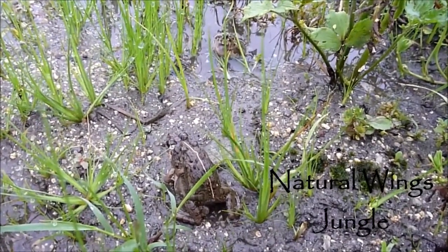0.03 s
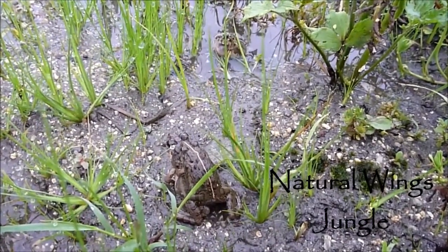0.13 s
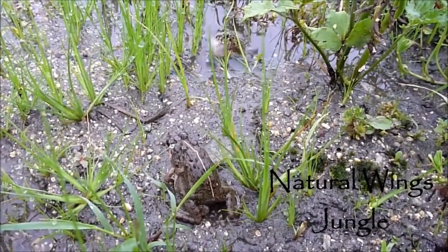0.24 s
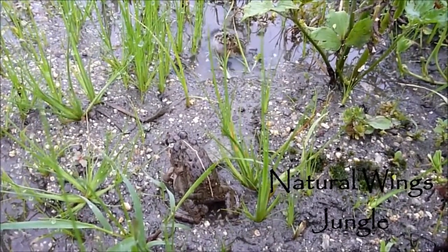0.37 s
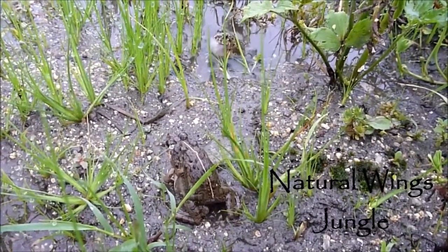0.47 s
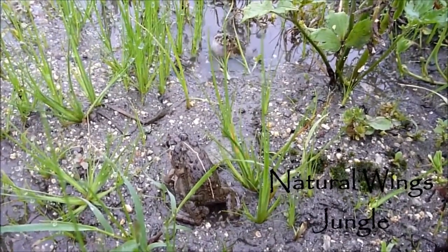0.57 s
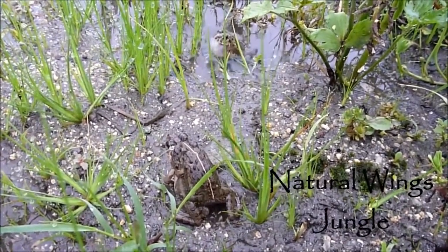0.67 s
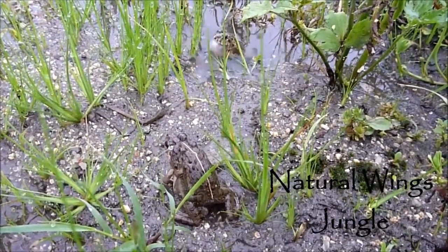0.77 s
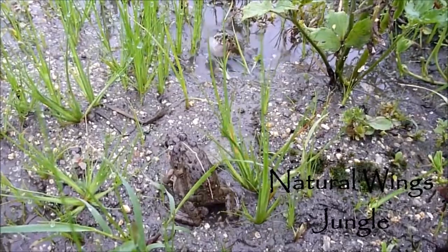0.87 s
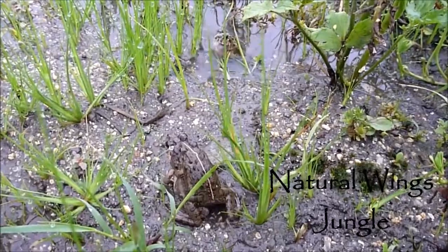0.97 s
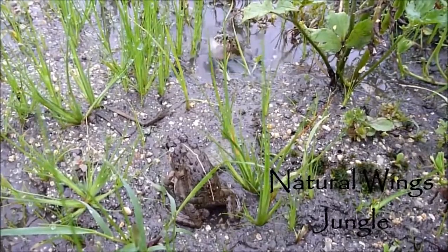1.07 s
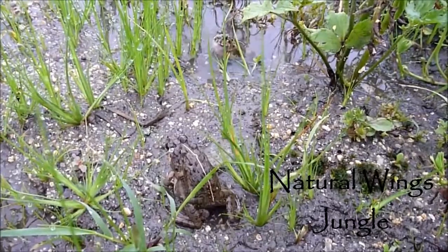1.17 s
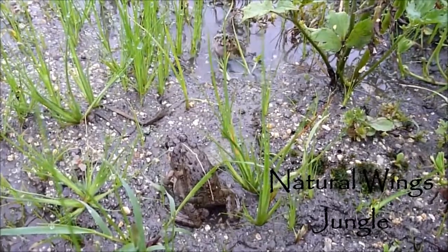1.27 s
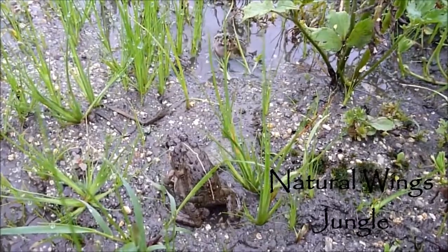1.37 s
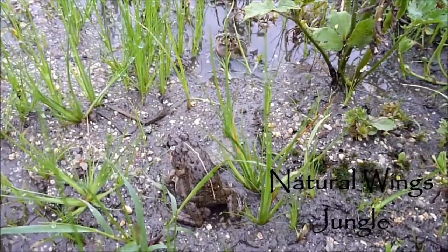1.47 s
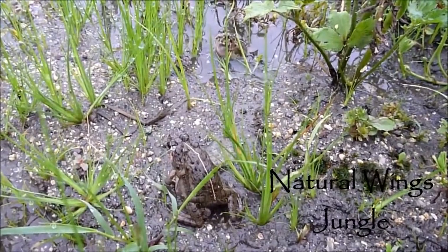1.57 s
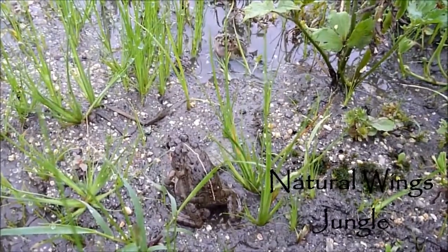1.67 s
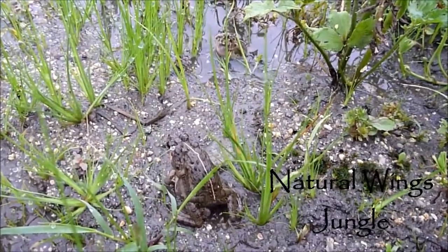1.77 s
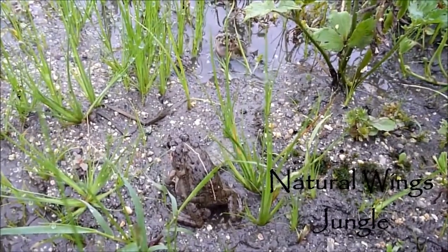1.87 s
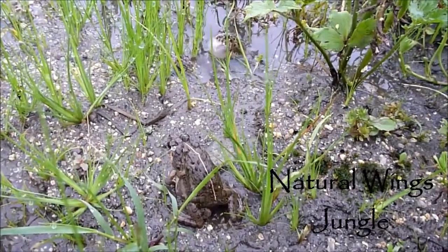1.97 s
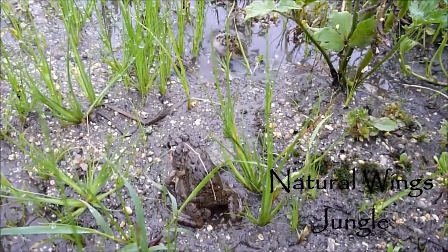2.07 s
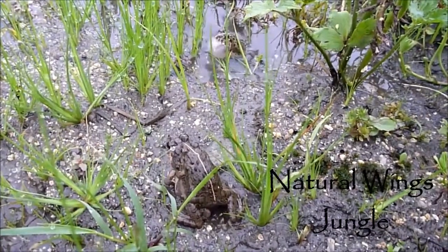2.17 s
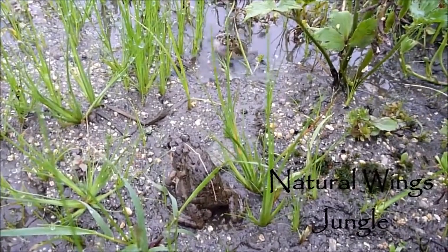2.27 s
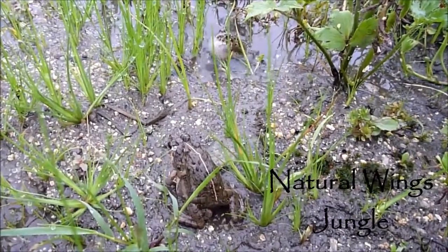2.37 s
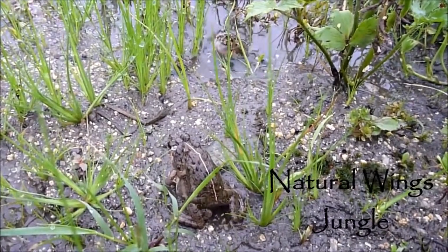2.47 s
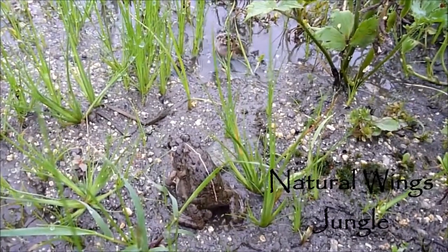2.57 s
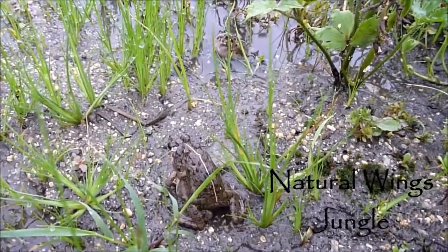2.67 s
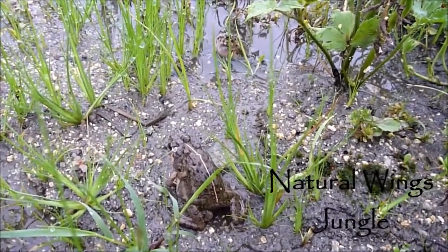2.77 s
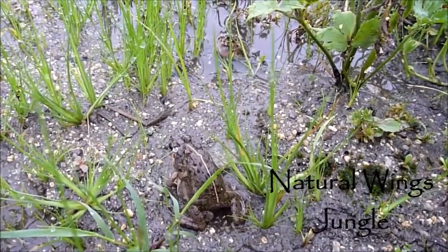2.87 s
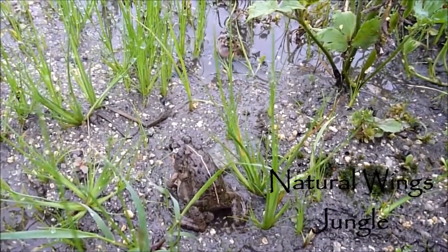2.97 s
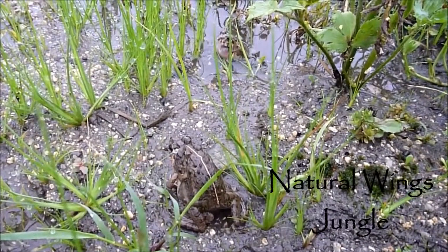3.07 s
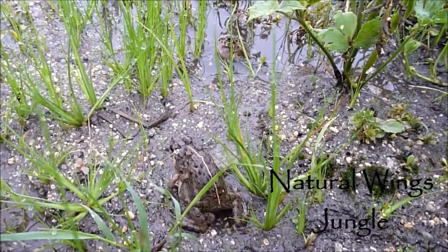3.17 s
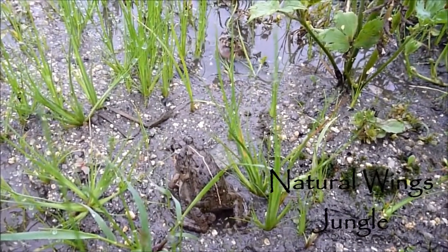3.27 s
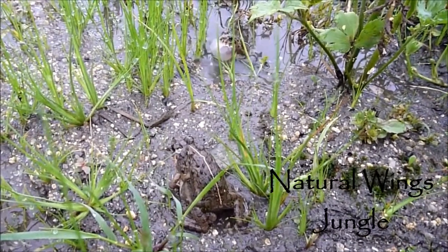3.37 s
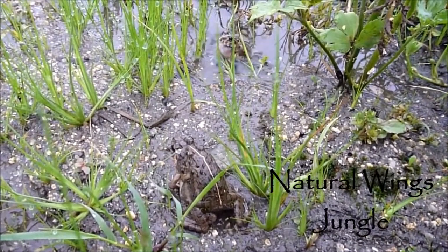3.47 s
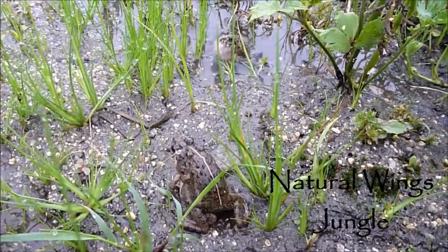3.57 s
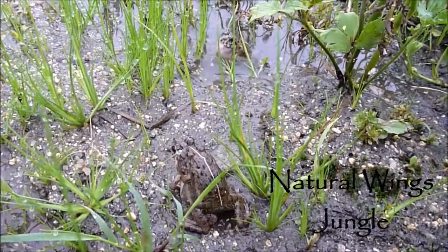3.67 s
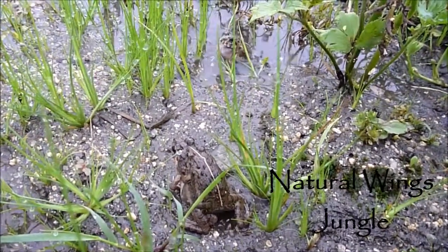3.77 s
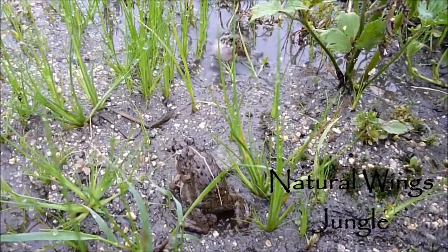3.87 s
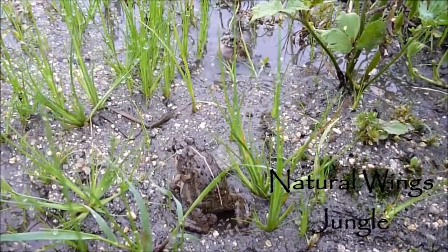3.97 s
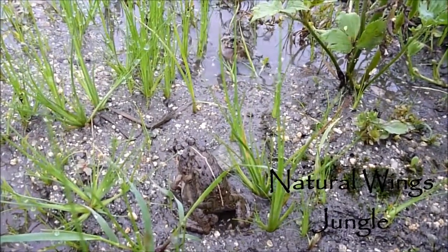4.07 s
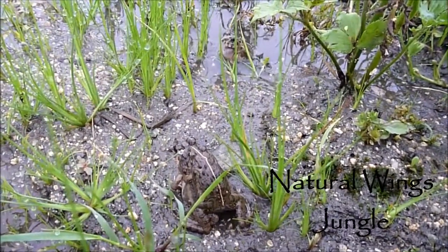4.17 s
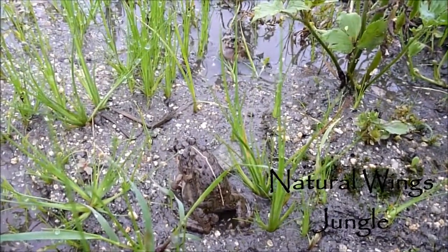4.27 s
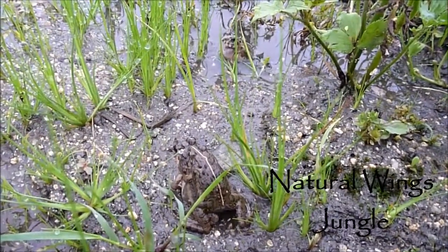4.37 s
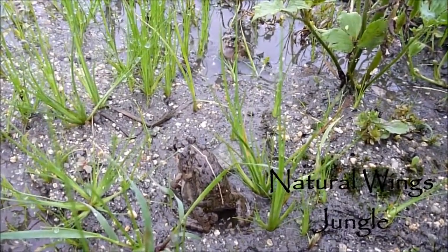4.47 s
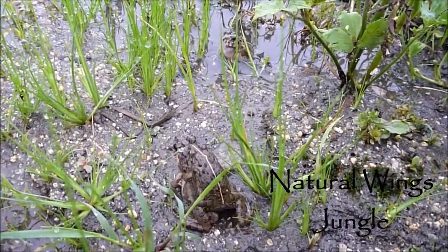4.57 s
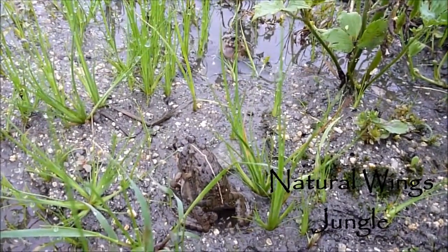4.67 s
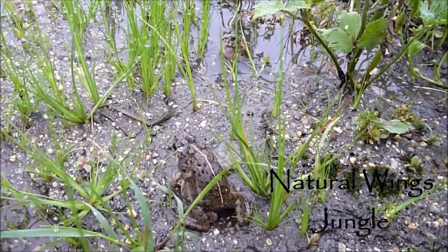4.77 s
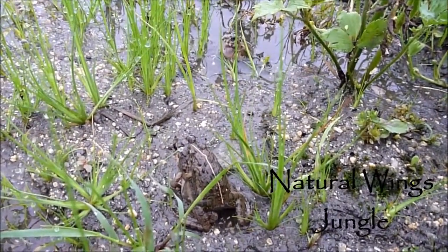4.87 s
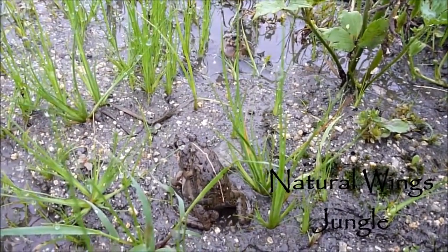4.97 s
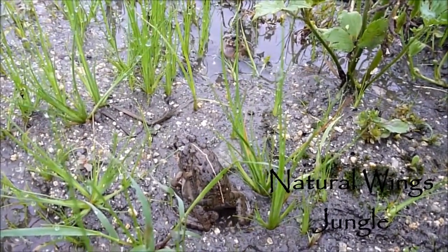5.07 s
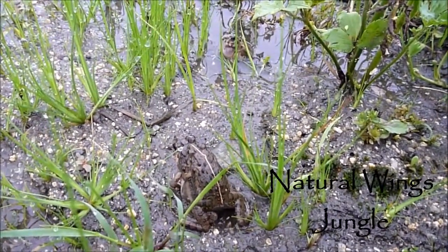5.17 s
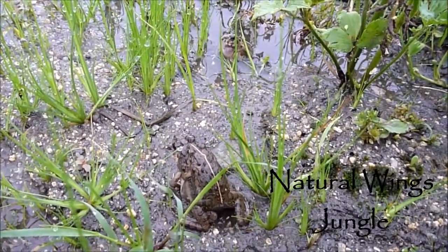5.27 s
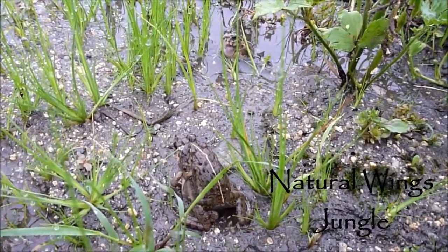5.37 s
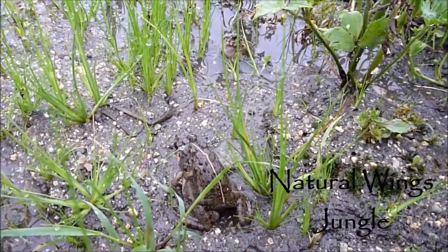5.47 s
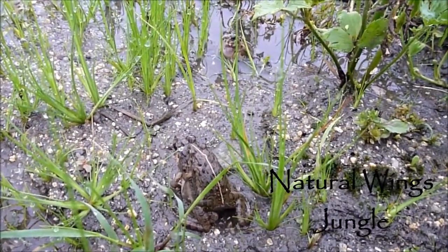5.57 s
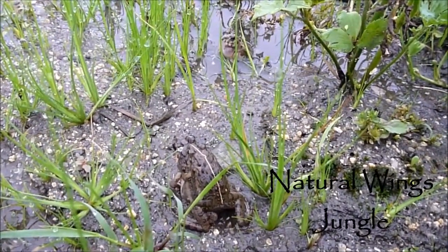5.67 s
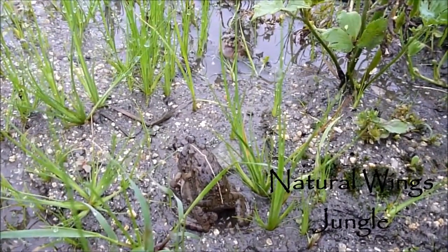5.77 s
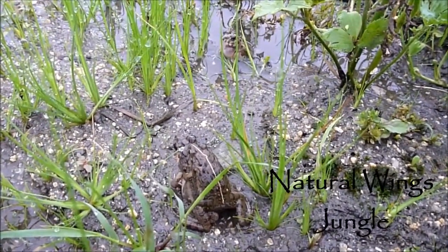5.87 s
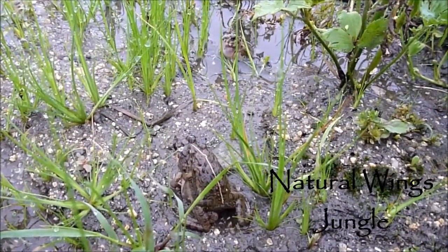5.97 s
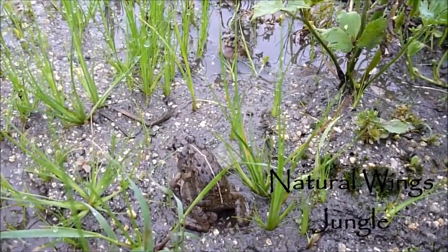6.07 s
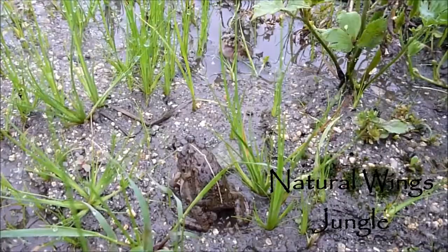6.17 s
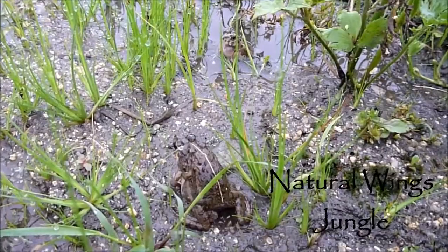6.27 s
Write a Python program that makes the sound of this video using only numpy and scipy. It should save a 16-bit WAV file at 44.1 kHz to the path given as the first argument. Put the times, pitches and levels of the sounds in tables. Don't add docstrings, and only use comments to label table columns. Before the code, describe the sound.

Outdoors on wet mud, close to a small camera microphone, one frog calls in three clusters of hard, purring croaks, some tailing into a tiny sagging note. Between and beneath them are a distant rival's duller croaks, round quiet peeps and rare ticks. The calling stops about two thirds through; the faint background rises slightly, with a high focus-motor whirr and a lone clearer peep near the end.

```python
import sys
import numpy as np
from scipy import signal
from scipy.io import wavfile
from scipy.ndimage import uniform_filter1d

SR = 44100
rng = np.random.default_rng(int(sys.argv[2]) if len(sys.argv) > 2 else 0)


def output_pcm(signal):
    pcm = np.clip(np.atleast_2d(signal).T, -1, 1) * 32767
    wavfile.write(sys.argv[1], SR, np.round(pcm).astype(np.int16))


def amplitude_ratio(level_db):
    exponent = np.asarray(level_db, float) / 20
    return 10 ** exponent


N = 279594
LEAD = 600


def evened(x):
    return x / np.sqrt(np.mean(x ** 2) + 1e-20)


def peaked(x):
    return x / (abs(x).max() + 1e-12)


def add(mix, s, sound):
    part = mix[round(s * SR):][:len(sound)]
    part += sound[:len(part)]


def ring(x, hz, width, order=1):
    b, a = signal.iirpeak(hz, hz / width, SR)
    for _ in range(order):
        x = signal.lfilter(b, a, x)
    return x


def band(x, low_hz, high_hz):
    sos = signal.butter(4, (low_hz, high_hz), "band", fs=SR, output="sos")
    return signal.sosfiltfilt(sos, x)


def coloured(points, patchy_db):
    hz = np.fft.rfftfreq(2048, 1 / SR)
    real, imag, patches = rng.standard_normal((N // 512 + 5, 1025, 3)).T
    patches = evened(uniform_filter1d(uniform_filter1d(patches, 20, 0), 6, 1))
    point_hz, point_db = np.transpose(points)
    shape_db = np.interp(np.log(hz + 1), np.log(point_hz + 1), point_db)
    z = (real + 1j * imag) * amplitude_ratio(shape_db[:, None] + patchy_db * patches)
    return signal.istft(z, nperseg=2048, noverlap=1536)[1][:N]


def gate(start, stop, edge):
    t = np.arange(N) / SR
    return np.clip(np.minimum(t - start, stop - t) / edge + .5, 0, 1)


def scatter(x, t60):
    at = np.arange(90, 8000, 40)
    at = at + rng.integers(0, 40, len(at))
    taps = np.zeros(8100)
    taps[at] = rng.choice([-1., 1.], len(at)) * amplitude_ratio(-60 * at / SR / t60)
    return signal.oaconvolve(x, taps / np.linalg.norm(taps))[:N]


# frequency in Hz, level in dB per Hz.
WASH_SPECTRUM = [(25, -32.5), (45, -17.5), (75, -10.5), (160, -6), (300, -5.5), (700, -10.5), (1100, -13.5),
                 (2500, -18), (4400, -22), (6500, -26), (7400, -31.5), (7900, -52.5), (8100, -91.5)]
# time in seconds, level in dB.
WASH_LEVEL = [(0.0, -59), (0.12, -59), (0.55, -62), (1.16, -62.5), (1.78, -60.5), (2.52, -62), (3.23, -60),
              (3.95, -62.5), (4.26, -61), (4.82, -60), (5.76, -57.5), (6.34, -57)]
# frequency in Hz, level in dB per Hz.
HISS_SPECTRUM = [(7700, -58.5), (8000, -11.5), (8600, -3), (10200, 0.5), (11500, -5), (13200, -6.5),
                 (14200, -13.5), (15700, -15)]
# frequency in Hz, width in Hz, level in dB.
HUM_BANDS = [(62.3, 8.8, -74), (215.8, 17, -68), (277, 8, -75), (164, 7.4, -77)]


def field():
    wash = coloured(WASH_SPECTRUM, 0.65)
    middle = signal.sosfilt(signal.butter(4, (100, 900), "band", fs=SR, output="sos"), wash)
    wash = wash / np.std(middle)
    hum = 0
    for hz, width, db in HUM_BANDS:
        hum = hum + amplitude_ratio(db + 60.5) * evened(ring(rng.standard_normal(N), hz, width, order=2))
    hiss = amplitude_ratio(-75.5 + 58.5) * evened(coloured(HISS_SPECTRUM, .8))
    s, db = np.transpose(WASH_LEVEL)
    return amplitude_ratio(np.interp(np.arange(N) / SR, s, db)) * (wash + hum + hiss)


# frequency in Hz, level in dB.
MOTOR_LINES = [(9329, -86.5), (9507, -87.5), (9868, -90), (10045, -79), (10228, -85), (10767, -87),
               (11483, -93.5), (11660, -95), (12382, -95), (12737, -94.5), (12920, -82), (13098, -89.5),
               (13814, -100)]
# start in seconds, stop in seconds, level in dB.
MOTOR_RUNS = [
    (0.765, 1.102, -3.5),
    (3.27, 3.611, -3),
    (5.263, 5.66, 1),
]


def camera():
    t = np.arange(N) / SR
    lines = sum(amplitude_ratio(db + 4) * np.sin(2 * np.pi * (hz * t + rng.random())) for hz, db in MOTOR_LINES)
    lines = lines * (1 + .3 * evened(uniform_filter1d(rng.standard_normal(N), 900)))
    whirr = amplitude_ratio(-75.5) * evened(ring(rng.standard_normal(N), 10300, 1500, order=2))
    runs = sum(amplitude_ratio(db) * gate(start, stop, 0.011) for start, stop, db in MOTOR_RUNS)
    scan = amplitude_ratio(-85 + 3) * np.sin(2 * np.pi * 15625 * t)
    return runs * (lines + whirr) + scan


# frequency in Hz, width in Hz, level in dB.
TREBLE_BANDS = [(5070, 420, -2.5), (5540, 1000, -1.5), (7280, 600, 0)]


def chirp(db, swing_ms, low_db, throat_db, treble_db, size=0.97, rough=0.46, haze_db=-29, sac_up=0.94):
    wobble, air = rng.standard_normal(3), rng.standard_normal((3, LEAD * 2))
    t = np.arange(-LEAD, LEAD) / SR
    opener = np.clip((treble_db + 22.5) / 4.0, 0, 1)
    soft = np.clip(-(db + 7.0) / 8.0, 0, 1)
    swing = (swing_ms + 2.4 - 1.1 * opener) / 1000

    glide = 64000 - 30000 * soft - 15000 * opener
    hz = size * (1480 - 70 * soft + 12 * wobble[0] + glide * np.minimum(t, .0005))
    turn = 2 * np.pi * (np.cumsum(hz) - hz[:LEAD].sum()) / SR + 0.21 + 0.81 * wobble[2]
    rise = np.clip((t + swing) / (0.48 * swing), 0, 1) ** 1.11
    folds = rise * np.clip((.0008 + .0009 * soft - t) / (0.00069 + 0.00028 * soft), 0, 1)
    snap = np.exp(-((t + 0.0008) / (0.00049 + 0.00018 * soft + 0.00016 * opener)) ** 2)
    rasp = 1 + rough * air[0]

    sac_hz = sac_up * (2828 + 24.0 * max(min(db + 14, 0), -11) + 12 * wobble[1])
    struck = snap * np.cos(2 * turn) * rasp
    damped = np.exp(-(np.maximum(t, 0) / (.0048 - 0.0011 * soft)) ** 3)
    leak = (0.66 + 0.42 * soft) * folds * np.clip((t + 0.0052) / 0.0029, 0, 1) * np.cos(2 * turn - .3)
    sac = damped * peaked(ring(struck, sac_hz, 140))
    sac = peaked(sac + leak + 0.25 * peaked(ring(struck, 2950 * sac_up, 650)))

    first = folds * np.cos(turn + 0.28) * rasp
    low = peaked(ring(first, 1674 * size, 770)) + 0.38 * peaked(ring(first, 1300 * size, 120))
    low = peaked(low)

    early = rise * np.clip((-.0018 + 0.0018 * opener - t) / 0.0012, 0, 1)
    third = np.cos(3 * turn + 1.6) * rasp
    throat = peaked(ring(early * third, 3600 * size * (1 + 0.036 * opener), 600))
    throat = throat + 0.45 * peaked(ring(snap * third, 4250 * size, 600))

    upper = np.cos(4 * turn) + np.cos(5 * turn) + (1.1 - .6 * opener) * air[1]
    upper = (folds + 1.1 * snap) * upper
    treble = peaked(sum(amplitude_ratio(g) * ring(upper, f, w, order=2) for f, w, g in TREBLE_BANDS))
    haze = np.exp(-((t + 0.002) / .005) ** 2) * evened(ring(air[2], 2100, 2200, order=2))
    voice = sac + amplitude_ratio(low_db) * low + amplitude_ratio(throat_db) * throat + amplitude_ratio(treble_db) * treble
    return amplitude_ratio(db) * (voice + amplitude_ratio(haze_db) * haze)


def croak(first, last, first_db, last_db, hurry, count):
    top_db, tire_db, uneven_db, hurry_power = -4.5, -3.5, 1.4, 3.2
    k = np.arange(count)
    u, chance = k / (count - 1), rng.standard_normal((4, count))
    gaps = (1 - hurry * u ** hurry_power + .04 * (k == 1)) * (k > 0)
    s = first + (last - first) * np.cumsum(gaps) / gaps.sum()

    collapse_db = (last_db - top_db - tire_db) * u ** 6.3
    db = top_db + tire_db * u + collapse_db + uneven_db * chance[0] * (u < 1)
    db = np.where(k == 0, first_db, db)
    swing_ms = np.where(k == 0, 4.3, 5.5 - 1.5 * u ** hurry_power + .4 * chance[1])

    low_db = -8 - 6 * np.sin(np.pi * u * .75) - .22 * collapse_db + uneven_db * chance[2]
    makeup_db = 0.49 * (-6.0 - first_db) * (1 - u)
    throat_db = -13.5 - 5.5 * u + makeup_db - 0.23 * collapse_db
    throat_db = np.where(k == 0, -26 - first_db, throat_db)
    treble_db = np.where(k == 1, -22.5, -32 + uneven_db * chance[3])
    treble_db = np.where(k == 0, -23.5 - first_db, treble_db)

    sac_up = 0.95 + .0035 * (-7.5 - first_db) + 0.033 * (k > 0) * (1 - u)
    return zip(s, sac_up, db, swing_ms, low_db, throat_db, treble_db)


SIGH_HARMONICS = [-11.5, -0.5, -18, -27, -33.5, -39]


def sigh(length, db):
    peak_at = 0.43
    u = np.arange(0, length, 1 / SR) / length
    hz = (1391 + 9.0 * (db + 17)) * (1 - .13 * u ** 3.0)
    turn = 2 * np.pi * (np.cumsum(hz) / SR + rng.random())
    note = 0
    for k, level_db in enumerate(SIGH_HARMONICS):
        note = note + amplitude_ratio(level_db + .3 * k * (db + 16.5)) * np.cos((k + 1) * turn)
    swell = np.sin(np.pi / 2 * np.minimum(u / peak_at, 1))
    swell = swell * np.minimum((1 - u) / (1 - peak_at), 1) ** 0.86
    flutter = 1 + 0.16 * evened(uniform_filter1d(rng.standard_normal(len(u)), size=24))
    return amplitude_ratio(db) * swell * note * flutter


CROAKS = {6: [(3.919, 3.9799, -7, -11.5, .1)], 7: [(.282, .3487, -7.5, -29, .33),
          (.9223, .9915, -11.5, -11, .25), (1.9758, 2.0434, -6, -20.5, .3),
          (2.3863, 2.4558, -11, -11.5, .27), (3.629, 3.7012, -7.5, -17, .2)],
          8: [(.5316, .6096, -8.5, -24, 0.39), (.7321, .8112, -11, -15, .36),
          (1.107, 1.1858, -11, -14.5, .34), (2.1894, 2.2704, -11.5, -11.5, .25),
          (3.3803, 3.4595, -4.5, -17, .22)]}
# start in seconds, length in seconds, level in dB.
SIGHS = [
    (0.3443, .009, -31),
    (0.606, .008, -28.5),
    (0.9912, .014, -16.5),
    (2.037, .007, -27.5),
    (2.269, .0125, -19.5),
    (2.4559, .0135, -18.5),
    (3.457, .008, -29.5),
    (3.699, .010, -21),
    (3.985, 0.014, -24),
]


def frog():
    out = np.zeros(N)
    for count, croaks in CROAKS.items():
        for call in croaks:
            for s, sac_up, *row in croak(*call, count=count):
                add(out, s - LEAD / SR, chirp(*row, sac_up=sac_up))
    for s, length, db in SIGHS:
        add(out, s, sigh(length, db))
    out = 1.05 * np.tanh(out / 1.05)
    return out + amplitude_ratio(-39) * scatter(out, .26)


# start in seconds, level in dB, frequency in Hz, octave in dB under the note.
PEEPS = [
    (0.4349, -51.5, 1227, -12.5),
    (1.5898, -52.5, 1234, -8),
    (2.147, -47, 1266, -10.5),
    (2.594, -52, 1265, -11.5),
    (3.2855, -46, 1257, -14.5),
    (3.861, -48, 1255, -16),
    (4.519, -47, 1264, -13),
    (6.0532, -42, 1260, -13.5),
]


def peeps():
    out, u = np.zeros(N), np.linspace(0, 1, 1700)
    t = u * .0385
    for s, db, hz, octave_db in PEEPS:
        turn = 2 * np.pi * hz * 1.016 * (t - 0.23 * t ** 2)
        note = abs(np.sin(np.pi * u ** .7)) ** 1.2 * np.sin(turn)
        octave = np.exp(-((u - .85) / 0.37) ** 2) * np.sin(2 * np.pi * 2520 * (t - .6 * t ** 2))
        add(out, s - .007, amplitude_ratio(db) * (note + amplitude_ratio(octave_db) * octave))
    return out


RIVAL_CROAKS = {3: [(.710, -47, 97), (3.588, -55, 100)], 6: [(2.122, -49, 105), (3.506, -49.5, 130)],
                7: [(.445, -49, 110)], 10: [(3.790, -48, 110), (4.071, -48, 100)]}


def rival():
    out = np.zeros(N)
    for count, croaks in RIVAL_CROAKS.items():
        for first, db, rate in croaks:
            for k in range(count):
                wobble = rng.standard_normal(3)
                fade_db = -.7 * k - 1.5 * (k == 0) + 1.1 * wobble[2]
                size = 1.05 + 0.0043 * k + .028 * wobble[0]
                sound = chirp(-5, 2.5, -0.88, -6.0, -24, size=size, rough=.7, haze_db=-11,
                              sac_up=1.12 + .04 * wobble[1])
                add(out, first + k / rate - LEAD / SR, amplitude_ratio(db + 7.0 + fade_db) * sound)
    out = signal.sosfilt(signal.butter(4, 5800, fs=SR, output="sos"), out)
    return out + amplitude_ratio(-8) * scatter(out, 0.072)


# start in seconds, level in dB, frequency in Hz, width in Hz.
TICKS = [
    (.727, -50, 13900, 3485),
    (.735, -59, 14050, 3030),
    (1.634, -56, 2300, 700),
    (4.743, -53, 4296, 400.6),
]


def ticks():
    out = np.zeros(N)
    for s, db, hz, width in TICKS:
        burst = rng.standard_normal(LEAD) * np.exp(-np.arange(LEAD) / 110)
        add(out, s, amplitude_ratio(db) * peaked(ring(burst, hz, width, order=2)))
    return out


# start in seconds, stop in seconds.
DIPS = [
    (.258, .273),
    (.513, .524),
    (1.954, 1.968),
    (2.374, 2.381),
    (3.903, 3.912),
]


def scene():
    t = np.arange(N) / SR
    back = field() + peeps() + rival()
    low = signal.sosfiltfilt(signal.butter(3, 750, fs=SR, output="sos"), back)
    dips = sum(gate(start, stop, .003) for start, stop in DIPS)
    back = low + (back - low) * (1 - .93 * np.clip(dips, 0, 1))

    near = band(frog(), 560, 11000)
    near = signal.sosfiltfilt(signal.butter(12, 7700, fs=SR, output="sos"), near)
    loudness = abs(near)
    mirrored = near * np.cos(2 * np.pi * 16000 * t)
    image = amplitude_ratio(-28) * band(mirrored, 11000, 11600)
    image = image + amplitude_ratio(-27.5) * band(near * loudness, 7900, 8900)

    back = back + camera()
    calling = np.clip(uniform_filter1d(loudness, 1200) / .004, 0, 1)
    back = back - .6 * calling * band(back, 14800, 16500)

    grit = rng.standard_normal(N) * uniform_filter1d(loudness, size=700)
    image = image + amplitude_ratio(-49) * band(grit, 9400, 11300)
    image = image + amplitude_ratio(-48) * band(grit, 7800, 9000)
    image = image + amplitude_ratio(-40) * band(grit, 250, 600)
    return (near + image + back + ticks())[None]


def top_cut(x):
    return signal.sosfilt(signal.butter(12, 15780, fs=SR, output="sos"), x)


def record(dry):
    return top_cut(dry)


dry = scene()
out = record(dry)
output_pcm(out)
```